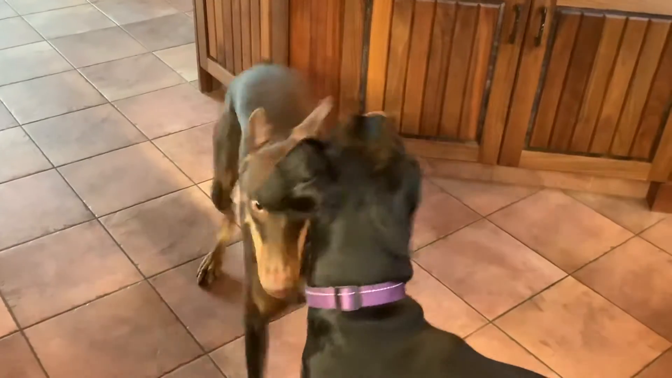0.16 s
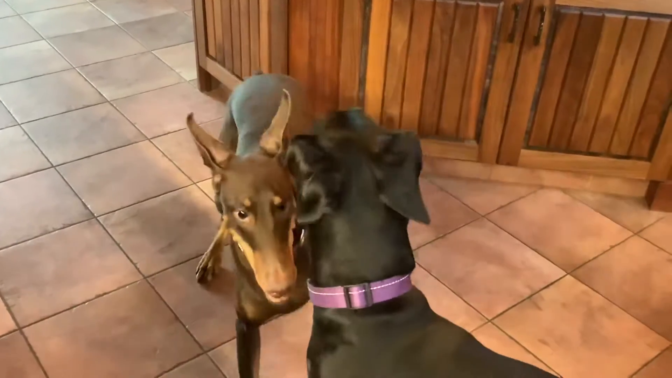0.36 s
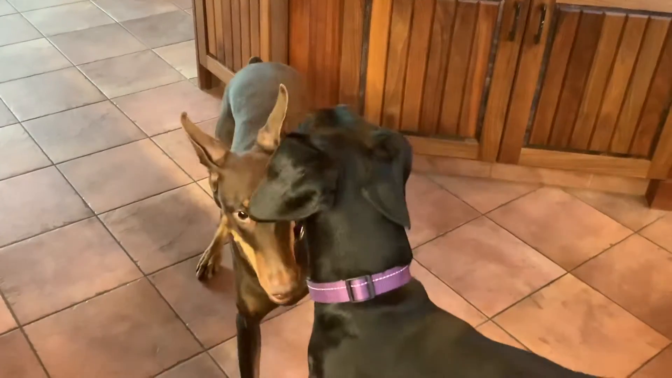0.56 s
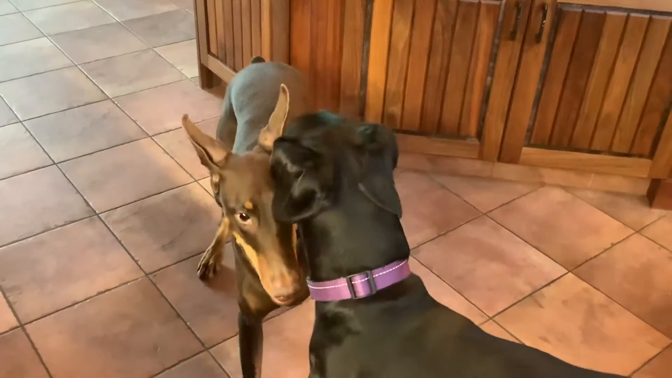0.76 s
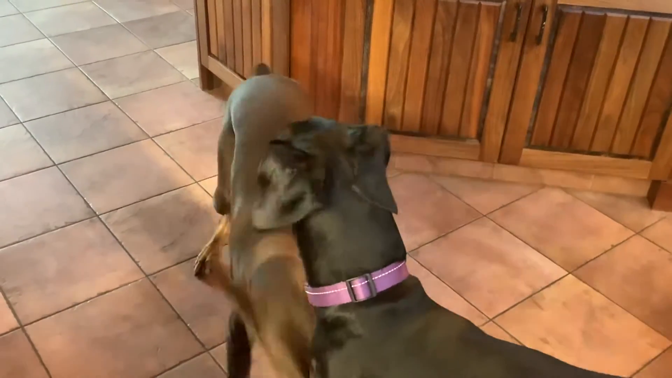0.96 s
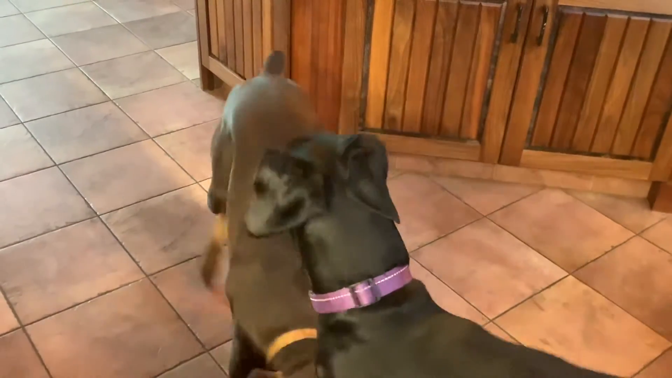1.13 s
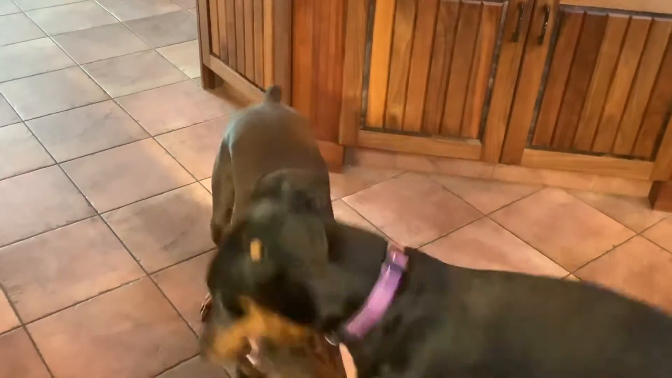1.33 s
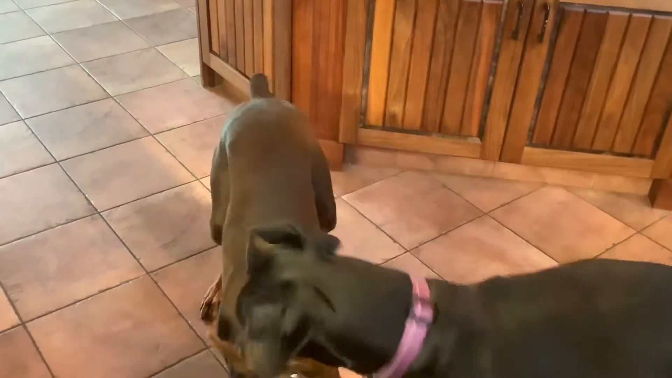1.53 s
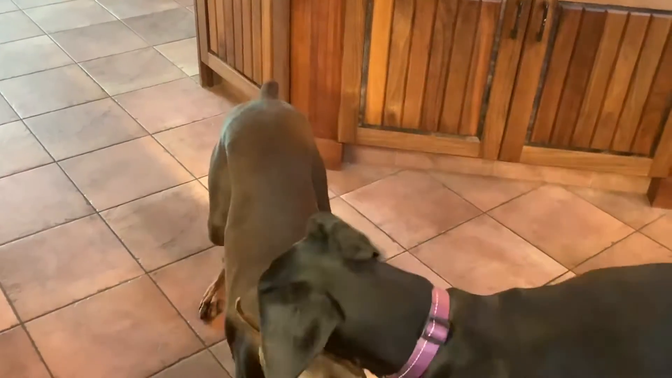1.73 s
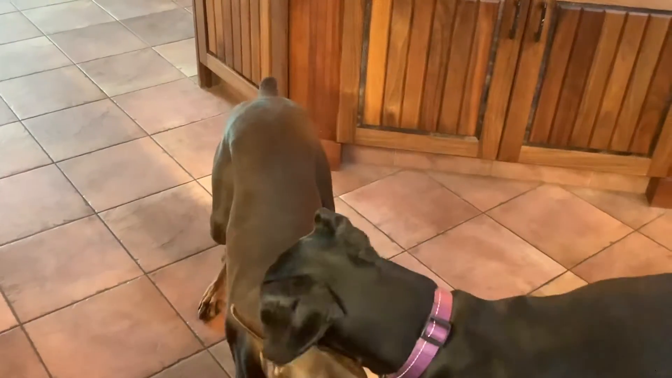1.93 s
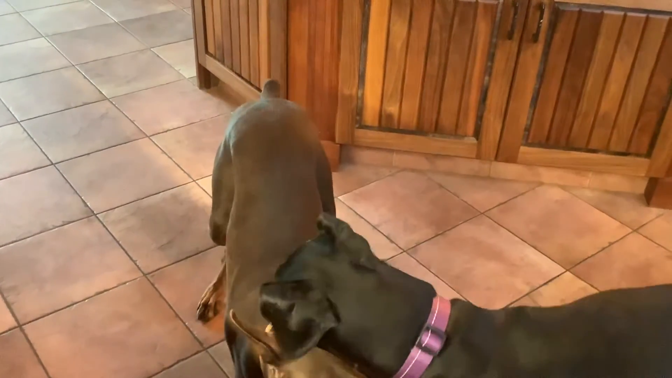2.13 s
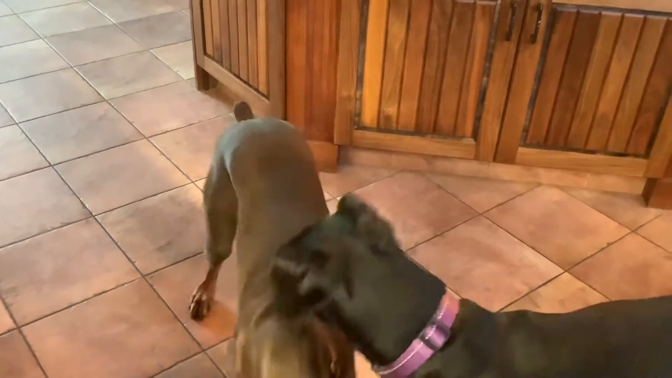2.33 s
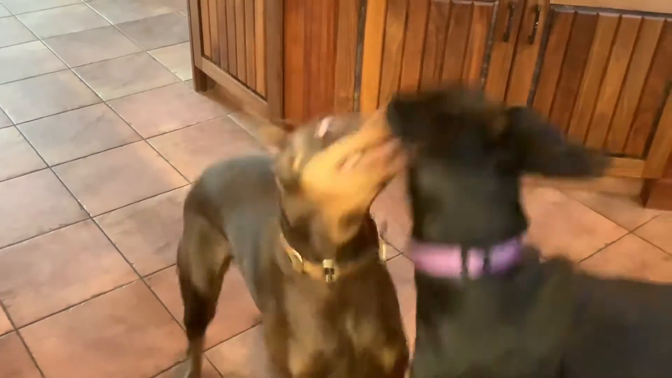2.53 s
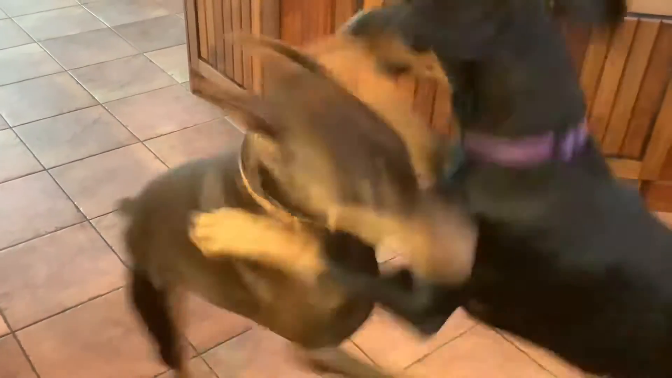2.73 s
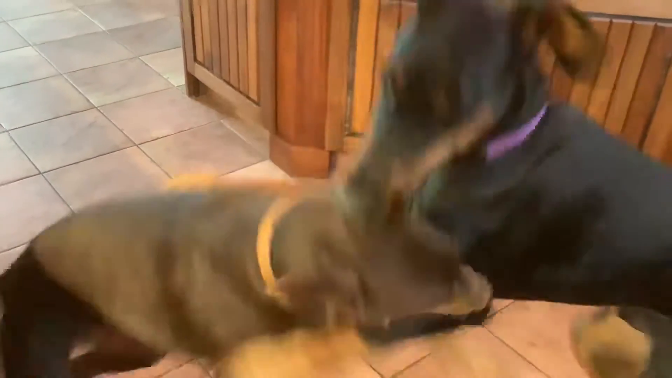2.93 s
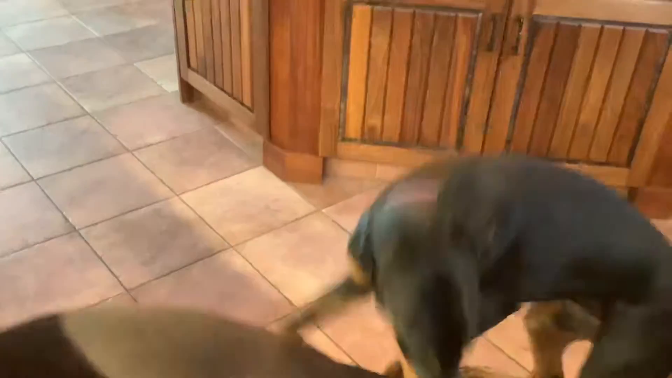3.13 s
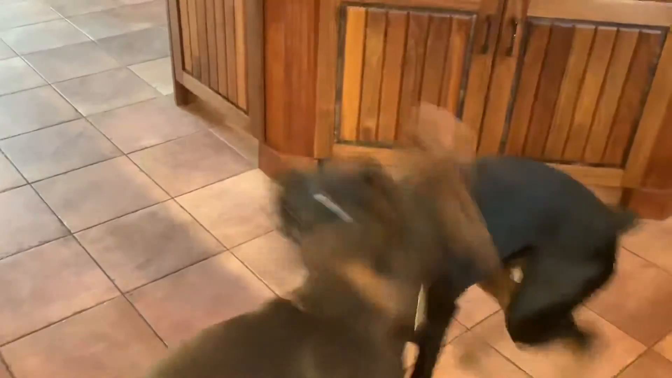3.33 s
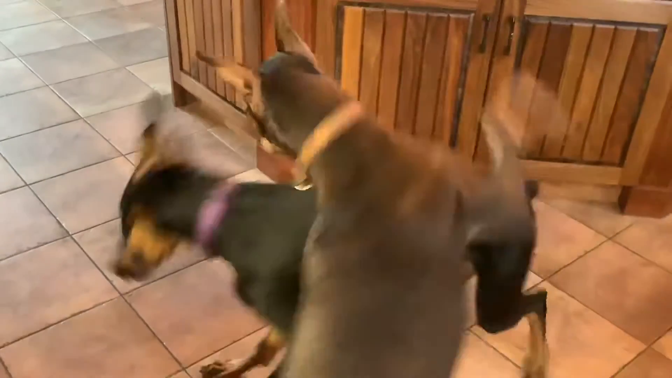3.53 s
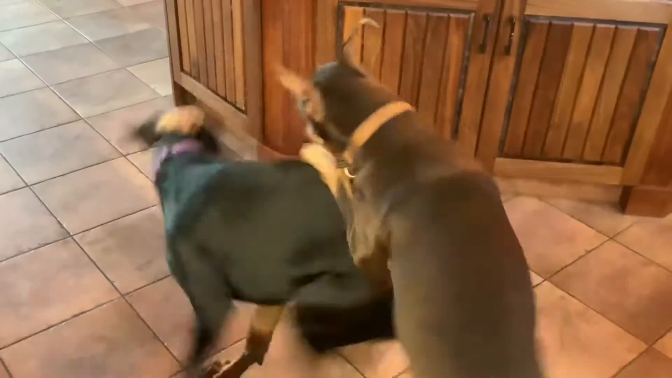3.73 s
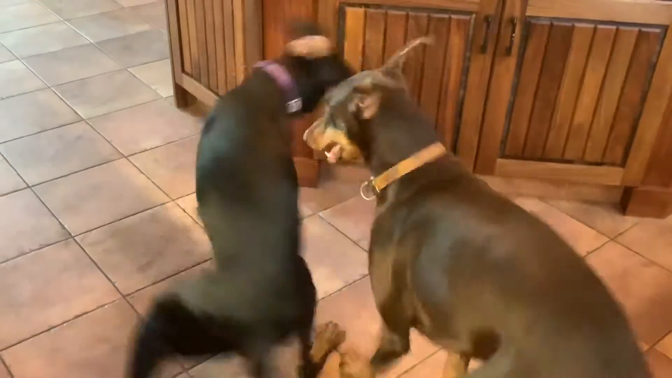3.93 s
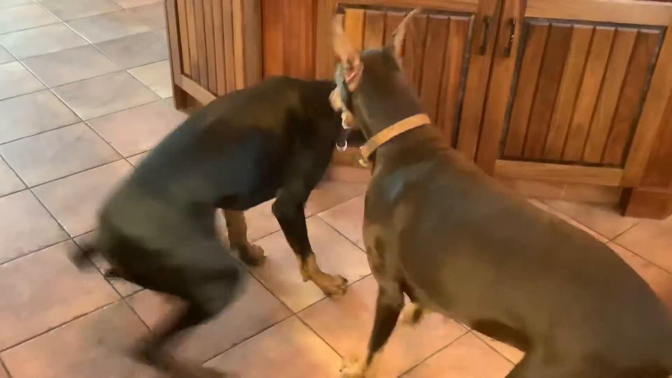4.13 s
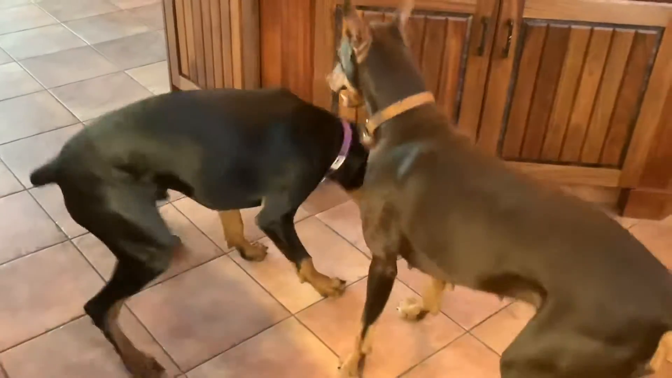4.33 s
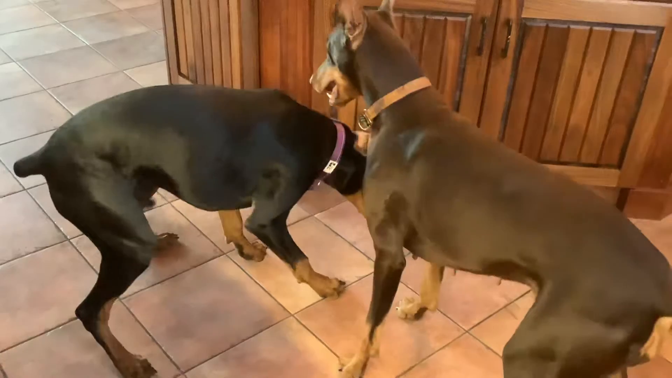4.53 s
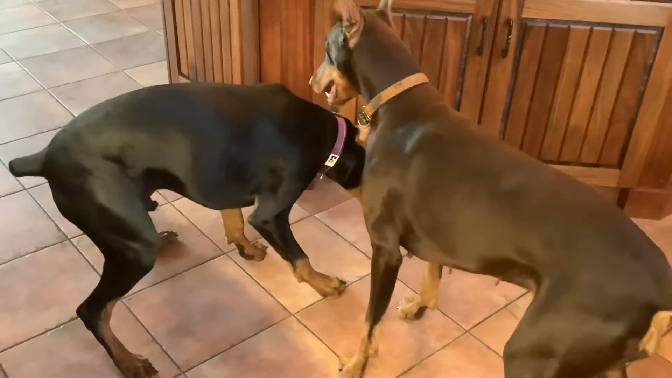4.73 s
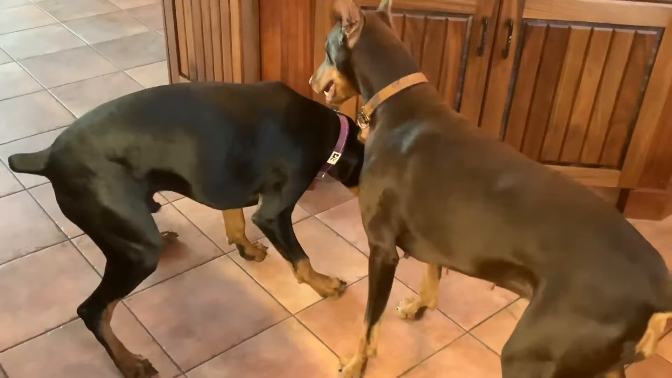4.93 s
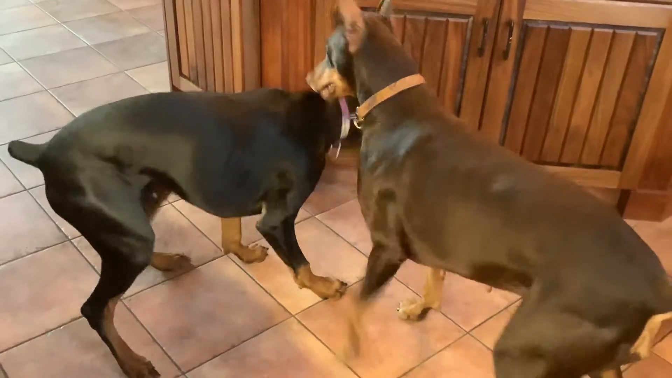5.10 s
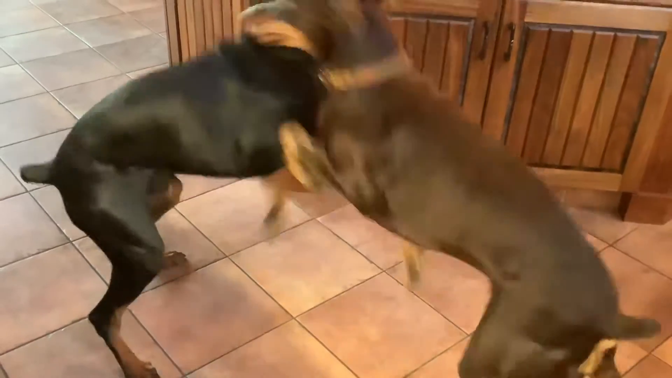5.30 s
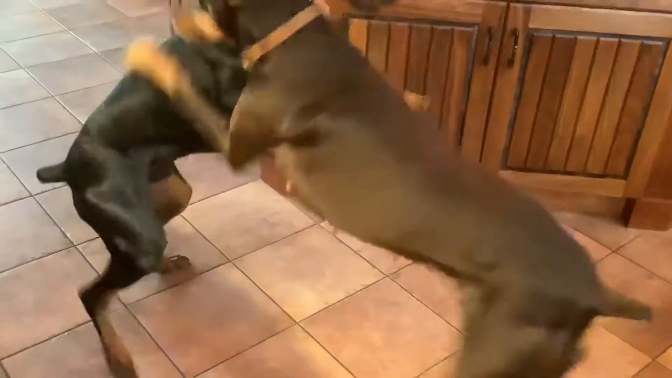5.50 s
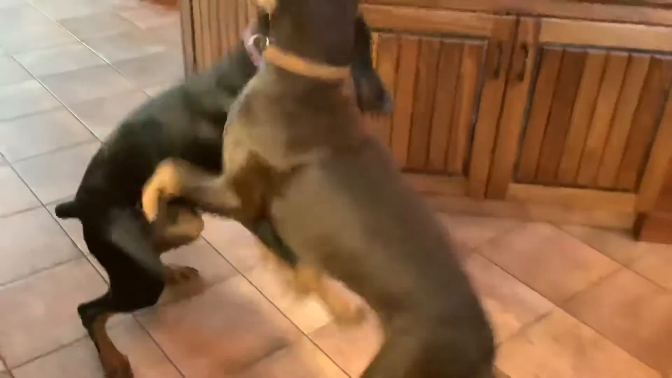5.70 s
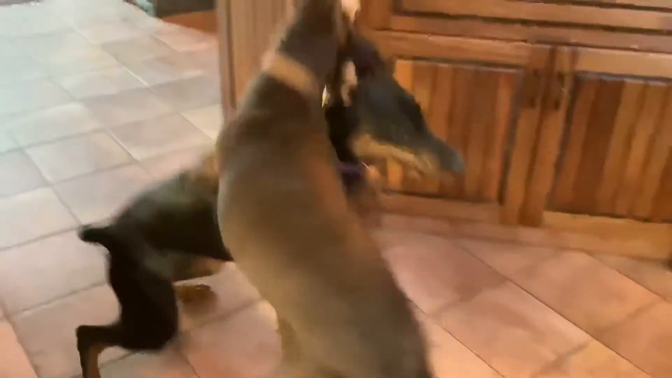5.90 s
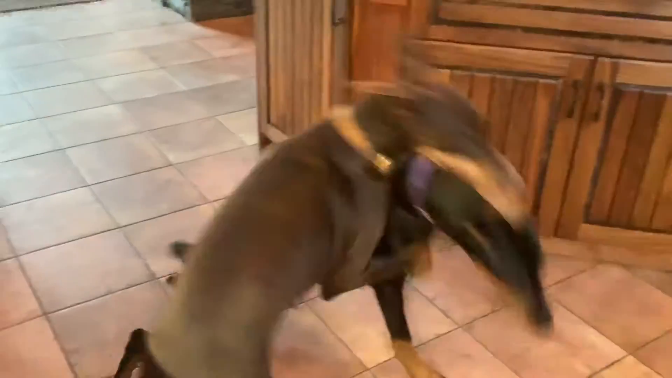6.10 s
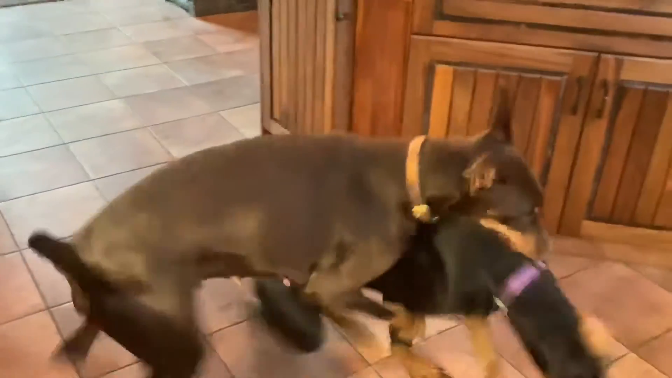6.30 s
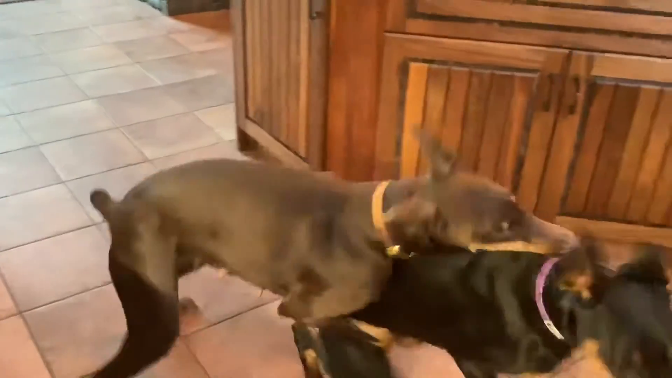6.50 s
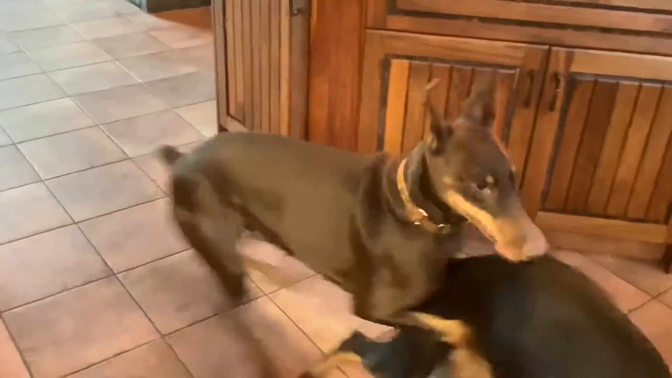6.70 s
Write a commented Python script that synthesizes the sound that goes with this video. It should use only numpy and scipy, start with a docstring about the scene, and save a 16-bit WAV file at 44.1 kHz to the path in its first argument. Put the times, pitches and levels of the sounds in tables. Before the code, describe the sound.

Two large dogs tussle on kitchen tiles. A quick huff and a small knock open it, then sparse claw taps and soft scuffs. From about the middle, a dense scramble of sharp clicks, scraping nails, hollow knocks and low thumps breaks out, pauses for nearly a second, then returns. Close mono microphone, hard echoing room, faint low hum beneath.

```python
"""Two big dogs wrestle on a tiled kitchen floor, over still air (shaped noise) and an appliance hum (sines).
They huff (swelling noise); coats rub and paws skid (coloured grains), amid light steps (dense low pats).
Throughout, claws click (short rings and chatter), paws and bodies knock on tiles and wooden cabinets (damped
modes, a push of weight, a slap), and heavy landings boom. Blows and landings flutter between floor and ceiling;
all but the landings, hum and still air get the answer of the hard room."""
import sys
import numpy as np
from scipy import signal
from scipy.fft import rfft, irfft, next_fast_len
from scipy.io import wavfile
from scipy.ndimage import uniform_filter1d

SR = 44100
rng = np.random.default_rng(int(sys.argv[2]) if len(sys.argv) > 2 else 0)


def unload_wav(signal):
    """Save mono or channel-first audio to the path in sys.argv[1] as 16-bit WAV at rate SR, clipped to [-1, 1]."""
    wavfile.write(
        sys.argv[1],
        SR,
        np.round(np.clip(np.atleast_2d(signal).T, -1, 1) * 32767).astype(np.int16),
    )


N = 297668

# Still room air. Each row: frequency in Hz, relative spectral density in dB.
AIR_SPECTRUM = [(15, -66), (25, -30.5), (41, -16), (64, -6), (92, -25.5), (114, -16), (134, -16),
                (149, -19.5), (242, -25), (270, -22.5), (354, -18.5), (2760, -46.5), (9840, -49.5),
                (16000, -51)]
# Appliance hum. Each row: frequency in Hz, rms level in dB ahead of the microphone.
HUM_TONES = [(60, -62), (120, -71.5), (240, -72.5)]
# Huffs through the muzzle. Each row: start in seconds, swell in seconds, fade in seconds, relative level in dB.
HUFFS = [(0.04, 0.057, 0.086, -65), (0.148, 0.097, 0.023, -37.5), (0.85, 0.086, 0.1, -69),
         (0.957, 0.052, 0.17, -49), (2.851, 0.039, 0.023, -43), (2.91, 0.012, 0.11, -38.5),
         (5.209, 0.059, 0.094, -45.5)]
# Breath noise. Each row: frequency in Hz, relative spectral density in dB.
MUZZLE_SPECTRUM = [(250, -3), (370, -5.5), (430, 2.5), (520, -3), (800, -7), (1000, -6), (1400, 0),
                   (1750, -11.5), (2100, -5.5), (2600, -15.5), (3000, -15), (4500, -21), (6500, -27.5),
                   (14000, -35)]
# Bouts of wrestling. Each row: start in seconds, end in seconds, relative effort in dB.
BOUTS = [(0.11, 0.286, -48.5), (0.997, 1.685, -53), (2.316, 2.901, -46), (2.877, 3.444, -37.5),
         (3.448, 4.245, -42), (5.2, 6.757, -43.5)]
# Coat brushing along coat. Each row: start in seconds, length in seconds, relative level in dB.
BRUSHES = [(0.13, 0.031, -59.5), (0.183, 0.14, -58), (1.092, 0.37, -49.5), (1.531, .06, -54),
           (1.582, .12, -53), (2.274, 0.084, -45), (2.433, 0.18, -48.5), (2.673, 0.24, -50),
           (2.839, 0.24, -49), (3.054, .19, -39.5), (3.33, .1, -47.5), (3.434, 0.21, -45),
           (3.719, .085, -41.5), (3.808, 0.21, -46), (4.124, .2, -48.5), (5.101, 0.07, -67),
           (5.156, 0.051, -57.5), (5.217, .1, -53), (5.338, 0.11, -48.5), (5.423, 0.14, -51),
           (5.597, 0.031, -49), (5.66, 0.036, -55), (5.797, 0.19, -50.5), (6.063, .06, -47),
           (6.198, 0.139, -45), (6.305, .14, -37.5), (6.48, .13, -55), (6.603, .11, -48.5)]
# Hair hiss. Each row: frequency in Hz, relative spectral density in dB.
COAT_SPECTRUM = [(400, -5), (1000, -2), (2500, -3), (5500, -0.5), (7000, 1), (12000, 0.5), (15500, 1)]
# Paw skids over the tiles. Each row: start in seconds, length before the stop in seconds, relative level in dB.
SKIDS = [(0.195, 0.043, -49), (0.987, 0.13, -54), (1.192, 0.23, -50), (1.622, .06, -56),
         (2.309, 0.042, -48), (2.47, 0.05, -41), (2.711, 0.057, -42.5), (2.865, 0.03, -36),
         (2.92, 0.052, -42), (3.053, 0.13, -38.5), (3.146, .035, -33), (3.223, 0.023, -39),
         (3.482, .17, -40.5), (4.153, 0.031, -41), (5.109, 0.092, -60.5), (5.363, 0.046, -35),
         (5.436, 0.12, -41.5), (5.804, 0.2, -42), (6.055, 0.018, -31.5), (6.243, .07, -38.5),
         (6.348, 0.061, -32.5), (6.435, 0.28, -43.5)]
# Nail scrape. Each row: frequency in Hz, relative spectral density in dB.
SKID_SPECTRUM = [(300, -28), (700, -3), (1500, 2.5), (2500, 1), (4000, 0), (5800, 0), (7000, -15),
                 (10000, -12.5), (15000, -32.5)]
# Claw clicks on tile. Each row: start in seconds, relative level in dB, pitch in Hz.
CLAWS = [(0.2735, -27.5, 2870), (1.051, -26.5, 2482), (1.075, -26.5, 2430), (1.3399, -24, 2478),
         (1.6272, -27.5, 3870), (2.506, -25, 5250), (2.5654, -29.5, 5800), (2.9443, -14, 2522),
         (3.0749, -21, 4540), (3.1147, -15, 4000), (3.1604, -13, 5765), (3.247, -19, 2600),
         (3.3029, -20.5, 5500), (3.66, -24, 5940), (3.732, -21, 2700), (3.9084, -16.5, 3730),
         (4.0653, -23, 3800), (4.1786, -22, 2900), (5.365, -27, 3530), (5.55, -25.5, 2400),
         (5.929, -12.5, 4600), (6.0637, -12, 4650), (6.0884, -25, 5930), (6.3903, -18.5, 3820),
         (6.6792, -22.5, 5960)]
# Nail chatter. Each row: frequency in Hz, relative spectral density in dB.
CHATTER_SPECTRUM = [(400, -12.5), (1200, 6), (3000, 1.5), (5500, 1), (8000, 3), (12000, -7), (16000, -11.5)]
# Paw and body blows. Each row: start in seconds, relative level in dB, pitch in Hz,
# relative push of weight in dB, relative slap in dB.
BLOWS = [(0.278, -23.5, 705, -4.5, -10), (0.287, -31, 179, -11, -17), (1.0522, -25.5, 520, -2.5, -13),
         (1.079, -21.5, 346, -8, -11.5), (1.089, -21, 260, -29, -34), (1.312, -28.5, 340, -15, -27),
         (1.3352, -21, 468, -13.5, -11.5), (1.632, -33.5, 275, -39, -6.5), (1.658, -37, 262, -33, -9),
         (2.358, -40.5, 627, -26, -4), (2.5678, -20.5, 493, -6.5, -15), (2.582, -25, 217, -3, -21),
         (3.005, -23.5, 253, -25, -13), (3.119, -25, 304, -24, -8), (3.1838, -14.5, 398, -21, -18.5),
         (3.196, -15, 379, -6, -16), (3.294, -20.5, 252, -22, -5.5), (3.304, -16.5, 467, -23, -16.5),
         (3.367, -20.5, 605, -3, -22.5), (3.49, -24, 1020, -25, -2), (3.491, -19, 240, -36, -20),
         (3.6126, -17, 422, -5.5, -12), (3.643, -20.5, 523, -5, -9.5), (3.735, -30, 176, -24, -4),
         (3.8262, -16.5, 289, -23.5, -20.5), (3.915, -25, 277, -9.5, -6), (4.003, -22.5, 236.2, -23, -11.5),
         (4.158, -24.5, 358, -7, -17), (5.44, -32.5, 472, -22, -10), (5.529, -30, 356, -9, -2),
         (5.606, -24, 332, -13, -15), (5.67, -15.5, 542, -16.5, -15.5), (6.089, -23, 320, -19, -4.5),
         (6.392, -22, 493, -9.5, -33), (6.482, -20.5, 488, -6, -13), (6.68, -26.5, 525, -31, -8.5),
         (6.689, -25.5, 171, -29, -31)]
# Modes of a knock. Each row: multiple of the blow's pitch, level in dB, multiple of its decay time.
KNOCK_MODES = [(0.582, -5.5, 1.4), (0.998, 0, 1), (1.5, -6, .6), (2.2, -10.5, .4)]
# First echoes off cabinets and walls. Each row: delay in seconds, level in dB.
WALL_ECHOES = [(.0052, -19), (.0089, -20), (.0176, -30), (.0233, -16), (.0314, -12.5)]
# A dog's weight lands on the floor. Each row: start in seconds, relative level in dB, pitch in Hz.
LANDINGS = [(0.298, -35, 76), (1.107, -29, 89), (2.592, -31, 73.4), (3.217, -35, 70), (3.388, -33, 71),
            (3.52, -29, 74.6), (3.719, -33, 70.2), (3.87, -30, 72), (4.257, -36, 67.6), (5.945, -32.5, 72),
            (5.977, -28.5, 105), (6.441, -31.5, 78.6)]
# Kitchen reverberation. Each row: frequency in Hz, time to fall 60 dB in seconds.
KITCHEN_T60 = [(60, 0.93), (250, 0.73), (700, 0.61), (1400, 1), (2500, 0.65), (5000, 0.46), (9000, 0.58),
               (15000, 0.23)]

BOUT_RISE_S, SETTLE_DB_PER_S = 0.13, 76.5
RUSTLE_DB, SCUFF_DB = -16, -9.5  # hair and nails during a bout, relative to its effort
BRUSH_PEAK_SHARE = 0.55  # how far through a brush the coats slide fastest
SKID_BITE_S, SKID_SAG_DB, SKID_STOP_S = 0.013, 4, 0.032
TIP_DB = -2  # sharp tip of the nail, relative to its ring
RING_CYCLES = 9.4  # pitch cycles for a knock to fall 60 dB: low ones last longer
NEAR_T60_S, NEAR_GAP_S = 0.063, 0.0047
TOP_HZ = 16050


def amp(db):
    """Decibels to gain."""
    return 10 ** (np.asarray(db) / 20)


def unit(x):
    """Scale to rms 1."""
    return x / np.sqrt(np.mean(x ** 2) + 1e-20)


def crest(x):
    """Scale to peak 1."""
    return x / np.max(np.abs(x))


def along(points, hz):
    """Interpolate (Hz, value) points on a log frequency axis."""
    f, v = np.transpose(points)
    return np.interp(np.log(hz + 1), np.log(f + 1), v)


def filtered(x, response):
    """Multiply the spectrum of x by a function of frequency."""
    size = next_fast_len(len(x) + SR // 4)
    hz = np.fft.rfftfreq(size, 1 / SR)
    return irfft(rfft(x, size) * response(hz), size)[:len(x)]


def coloured(x, spectrum):
    """Shape x to a spectrum that closes steeply below its first point, rms 1."""
    def response(hz):
        low_cut = np.minimum(hz / spectrum[0][0], 1) ** 2
        return amp(along(spectrum, hz)) * low_cut
    return unit(filtered(x, response))


def add(track, start_s, sound):
    """Mix a sound into a track."""
    start = max(round(start_s * SR), 0)
    part = sound[:max(N - start, 0)]
    track[start:start + len(part)] += part


def ring(t, hz, t60_s, attack_s):
    """One damped mode with a soft onset, peak 1."""
    onset = (1 - np.exp(-t / attack_s)) ** 2
    return crest(np.sin(2 * np.pi * hz * t) * amp(-60 * t / t60_s) * onset)


def grains(per_s, spread_db):
    """Random impulses of uneven size."""
    hits = rng.random(N) < per_s / SR
    return hits * rng.standard_normal(N) * amp(spread_db * rng.standard_normal(N))


def room(x, near_db, far_db):
    """Direct sound, scatter off near cabinets and a tail whose decay varies with frequency; new at each call."""
    hz, frame_s, z = signal.stft(rng.standard_normal(SR * 3 // 4), SR, nperseg=256)
    decay = amp(-60 * frame_s / along(KITCHEN_T60, hz)[:, None])
    tail = signal.istft(z * decay, SR, nperseg=256)[1]
    t = np.arange(len(tail)) / SR
    tail = tail * (t > 2 * NEAR_GAP_S)  # far walls answer later than near cabinets
    near = rng.standard_normal(len(t)) * amp(-60 * t / NEAR_T60_S) * (t > NEAR_GAP_S)
    answer = amp(near_db) * near / np.linalg.norm(near) + amp(far_db) * tail / np.linalg.norm(tail)
    answer[0] += 1  # direct sound
    return signal.fftconvolve(x, answer)


def walls(x):
    """Hard surfaces close by each return one copy."""
    def response(hz):
        return 1 + sum(amp(db) * np.exp(-2j * np.pi * hz * delay_s) for delay_s, db in WALL_ECHOES)
    return filtered(x, response)


def flutter(x, share, keep, round_trip_hz):
    """Low sound bounces between floor and ceiling, losing treble and level on each round trip."""
    def response(hz):
        trip = np.exp(-2j * np.pi * hz / round_trip_hz) / (1 + (hz / 600) ** 2)
        return 1 + share * trip / (1 - keep * trip)
    return filtered(np.pad(x, (0, SR // 3)), response)


def background():
    """Still air is shaped noise; the appliance hums in steady sines."""
    t = np.arange(N) / SR
    hum = sum(amp(db) * np.sqrt(2) * np.sin(2 * np.pi * (hz * t + rng.random())) for hz, db in HUM_TONES)
    air = coloured(rng.standard_normal(N), AIR_SPECTRUM)
    return hum + amp(-62.5) * air


def huffs():
    """Air rushes through a dog's muzzle: noise that swells and stops."""
    t = np.arange(N) / SR
    flow = np.zeros(N)
    for start, swell, fade, db in HUFFS:
        flow += amp(db) * np.interp(t, [start, start + swell, start + swell + fade], [0, 1, 0])
    breath = coloured(rng.standard_normal(N), MUZZLE_SPECTRUM)
    return room(flow * breath * amp(1.5), near_db=-2.5, far_db=-6.5)[:N]


def effort():
    """How hard the dogs wrestle: each bout builds, holds and settles; the strongest counts."""
    t = np.arange(N) / SR
    levels = []
    for start, end, db in BOUTS:
        rise = np.clip((t - start) / BOUT_RISE_S, 0, 1)
        levels.append(rise * amp(db - SETTLE_DB_PER_S * np.maximum(t - end, 0)))
    return np.max(levels, axis=0)


def shuffling():
    """Light steps and shoves between big blows: a dense run of many small low pats that follows the effort."""
    spectrum = [(60, 6), (110, -7.5), (200, -2.5), (420, -2.5),
                (700, -4.5), (1300, -20.5), (3000, -15), (8000, -67)]  # (Hz, relative dB)
    pats = coloured(grains(per_s=460, spread_db=0.3), spectrum)
    return room(pats * effort() * amp(-5), near_db=-8, far_db=-2.0)[:N]


def brush_strokes():
    """Level of coat on coat: each brush swells and fades smoothly."""
    t = np.arange(N) / SR
    level = np.zeros(N)
    for start, length, db in BRUSHES:
        slide = np.interp((t - start) / length, [0, BRUSH_PEAK_SHARE, 1], [0, 1, 0])
        level += amp(db) * np.sin(np.pi / 2 * slide)
    return level


def skid_strokes():
    """Level of nails on tile: each skid bites, slows and stops."""
    t = np.arange(N) / SR
    level = np.zeros(N)
    for start, length, db in SKIDS:
        corners_s = [0, SKID_BITE_S, length, length + SKID_STOP_S]
        level += amp(db) * np.interp(t - start, corners_s, [0, 1, amp(-SKID_SAG_DB), 0])
    return level


def shifting(x, depth_db):
    """The colour of the hair hiss and nail scrape wanders at random; rms 1."""
    z = signal.stft(x, nperseg=512)[2]
    field = rng.standard_normal(z.shape)
    for _ in range(2):
        field = uniform_filter1d(field, size=3, axis=0)  # across frequency
        field = uniform_filter1d(field, size=4, axis=1)  # across time
    return unit(signal.istft(z * amp(depth_db * unit(field)), nperseg=512)[1][:N])


def rubbing():
    """Short hair brushes in a fine hiss; nails stick and slip over the tiles in coarser grains."""
    hair = shifting(coloured(grains(per_s=9800, spread_db=0.5), COAT_SPECTRUM), depth_db=2.5)
    coat = hair * np.hypot(brush_strokes(), amp(RUSTLE_DB) * effort()) * amp(3.0)
    nails = shifting(coloured(grains(per_s=4500, spread_db=0), SKID_SPECTRUM), depth_db=2.5)
    skid = nails * np.hypot(skid_strokes(), amp(SCUFF_DB) * effort())
    return room(coat + skid, near_db=-22.5, far_db=-9.5)[:N]


def claws():
    """A nail snaps on the tile, rings and chatters briefly; the floor mirrors it just after."""
    track, t = np.zeros(N), np.arange(SR // 12) / SR
    for start, db, hz in CLAWS:
        noise = coloured(rng.standard_normal(len(t)), CHATTER_SPECTRUM)
        chatter = crest(noise * amp(-60 * t / 0.024))
        tip = ring(t, hz=11900, t60_s=0.00052, attack_s=0.00005)
        snap = ring(t, hz, t60_s=0.00097, attack_s=0.0001) + amp(TIP_DB) * tip
        contact = snap + 0.45 * chatter
        click = filtered(contact, lambda f: 1 + 0.89 * np.exp(-2j * np.pi * f * 0.0027))  # floor mirror
        add(track, start, amp(db + 1.5) * room(crest(click), near_db=-7.0, far_db=-13.0))
    return track


def blows():
    """A blow is a short hollow knock of damped modes, a soft push of weight and the slap of a pad."""
    track, t = np.zeros(N), np.arange(SR // 6) / SR
    pad_spectrum = [(400, -4), (750, 1), (1200, -2), (2200, -7.5), (5000, -60.5), (12000, -51.0)]  # (Hz, dB)
    for start, db, hz, push_db, slap_db in BLOWS:
        knock = np.zeros(len(t))
        for ratio, mode_db, life in KNOCK_MODES:
            knock += amp(mode_db) * ring(t, ratio * hz, life * RING_CYCLES / hz, attack_s=0.0024)
        push = ring(t, hz=145, t60_s=0.021, attack_s=0.0066)
        pad = coloured(rng.standard_normal(len(t)), pad_spectrum)
        slap = crest(pad * amp(-60 * t / 0.041) * (1 - np.exp(-t / 0.0009)))
        blow = crest(knock) + amp(push_db + 1.0) * push + amp(slap_db + 3.0) * slap
        bounced = flutter(walls(blow), share=0.2, keep=0.71, round_trip_hz=74.9)
        add(track, start, amp(db + 1.03) * room(bounced, near_db=-4.5, far_db=-6.0))
    return track


def landings():
    """Heavy, soft landings make the room boom: one low damped mode with flutter."""
    track, t = np.zeros(N), np.arange(SR // 4) / SR
    for start, db, hz in LANDINGS:
        thump = ring(t, hz, t60_s=0.046, attack_s=0.007)
        add(track, start, amp(db + 4.0) * flutter(thump, share=0.38, keep=0.88, round_trip_hz=71.2))
    return track


def scene():
    """Both dogs in the kitchen, heard from one point."""
    dogs = huffs() + shuffling() + rubbing() + claws() + blows() + landings()
    return (background() + dogs)[None]


def record(dry):
    """The microphone thins the deep bass and keeps nothing above its band limit."""
    bass_cut = signal.butter(4, 45, "highpass", fs=SR, output="sos")
    return np.array([filtered(signal.sosfilt(bass_cut, x), lambda hz: hz < TOP_HZ) for x in dry])


dry = scene()
out = record(dry)
unload_wav(out)
```